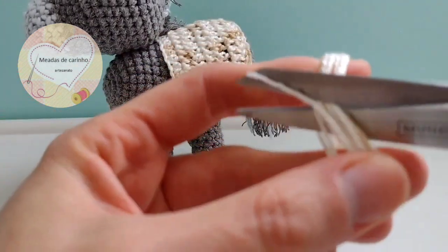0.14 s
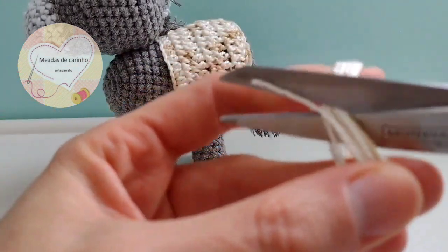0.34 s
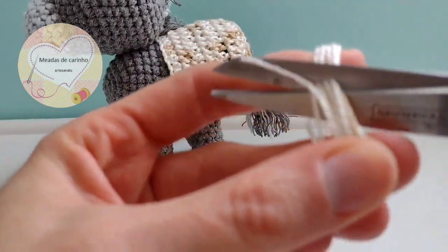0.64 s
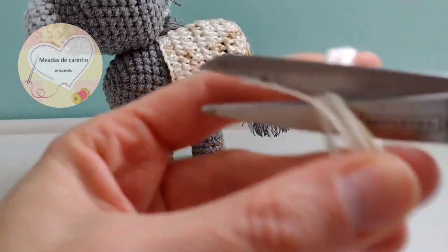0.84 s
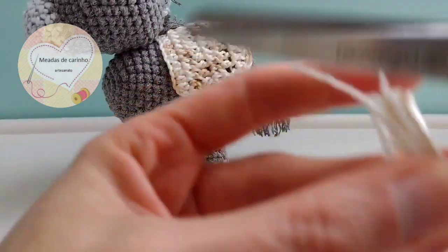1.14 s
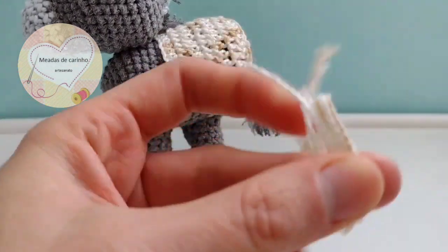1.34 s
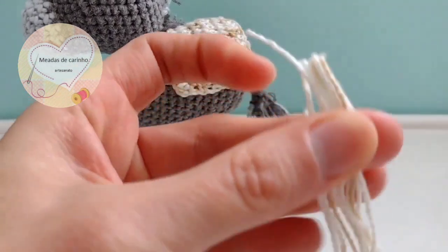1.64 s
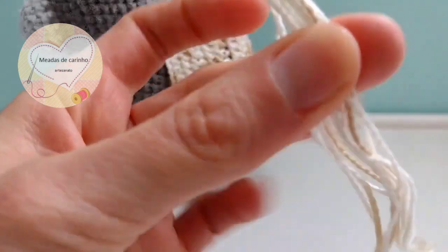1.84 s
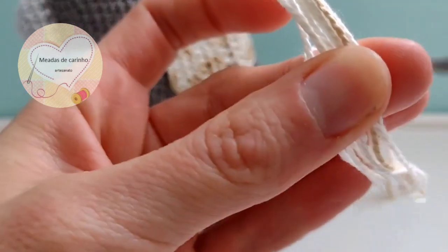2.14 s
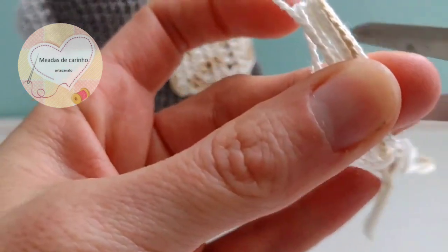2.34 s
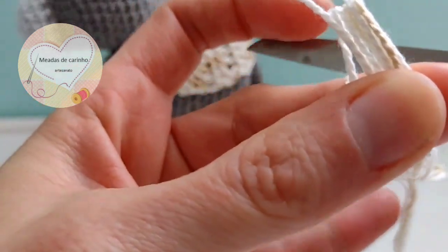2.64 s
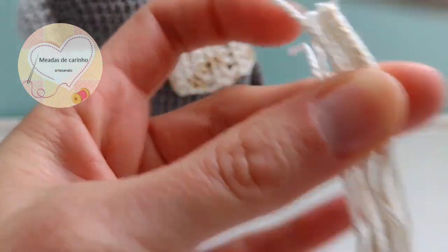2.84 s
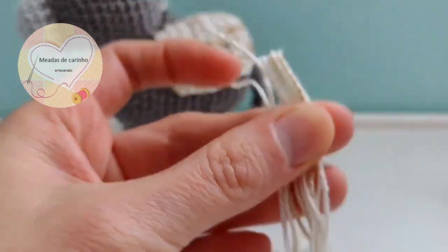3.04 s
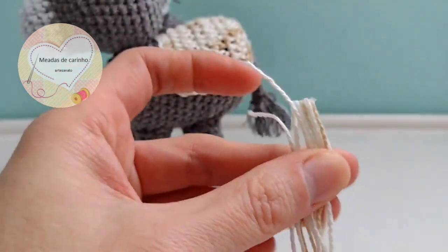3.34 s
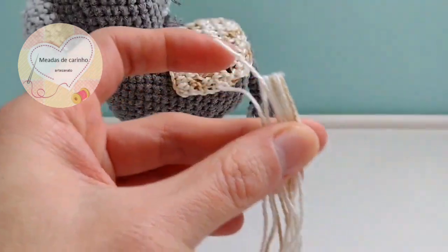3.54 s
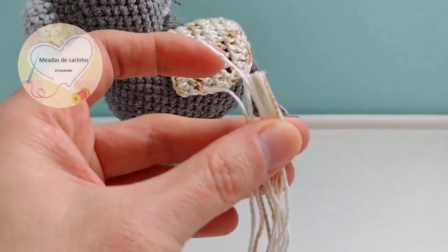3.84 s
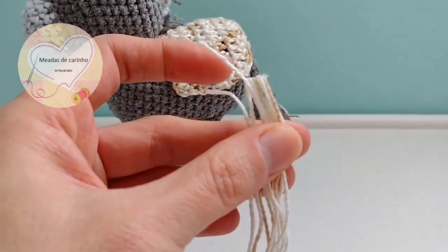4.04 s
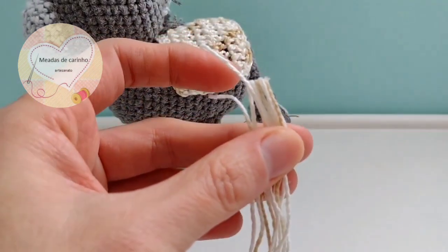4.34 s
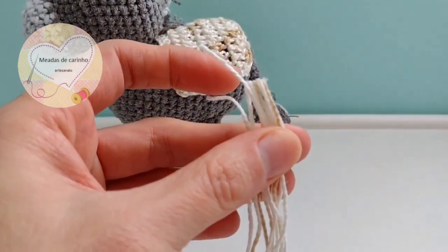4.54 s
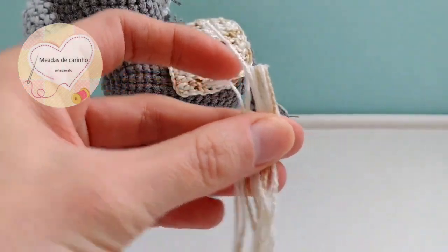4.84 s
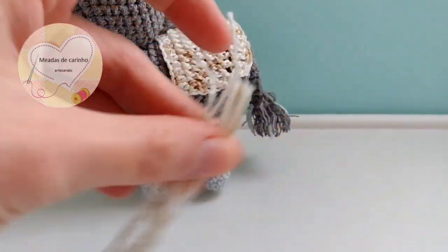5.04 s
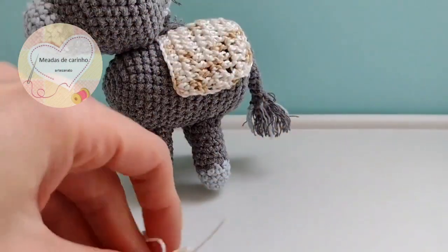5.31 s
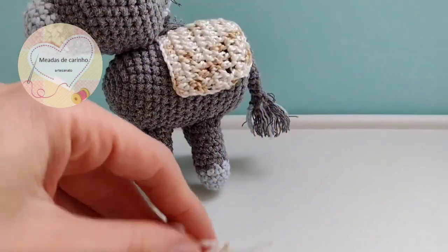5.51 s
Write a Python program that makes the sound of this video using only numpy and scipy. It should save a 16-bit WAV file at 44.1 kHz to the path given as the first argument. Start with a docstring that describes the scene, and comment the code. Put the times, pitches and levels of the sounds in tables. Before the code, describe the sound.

Close-up steel scissors snip cotton thread in crisp bright clusters, then are set down with a clack and slide on a table in a quiet room.

```python
"""Scissors cutting thread, close up

Steel scissors cut loops of cotton thread a hand's width from a phone, nearer its right microphone.
Uneven slips of the blades on the fibres make the cutting; snaps are short chatter and cracks of steel.
The scissors are laid on a table and pushed aside, and a hand brushes the top: its modes ring and the contact rasps.
Fingers roll the thread, edges squeak, soft bumps ring and faint hums swell.
A small quiet room adds reflections, steady air noise and faint far whistles; each channel has its own limiter."""
import sys
import numpy as np
from scipy import signal
from scipy.fft import rfft, irfft
from scipy.io import wavfile
from scipy.ndimage import uniform_filter1d

SR = 44100
rng = np.random.default_rng(int(sys.argv[2]) if len(sys.argv) > 2 else 0)


def to_wav(s):
    """Save 16-bit WAV."""
    ch = np.atleast_2d(s).T  # columns
    pcm = np.round(np.clip(ch, -1, 1) * 32767)  # PCM
    wavfile.write(sys.argv[1], SR, pcm.astype(np.int16))


N = 250160
TIME = np.arange(N) / SR
# modes of the table top, before a blow favours some of them: (f/Hz, level/dB, t60/s)
TABLE_MODES = [(102, -9.5, 0.15), (128, -8.5, 0.071), (146.3, -13, 0.19), (183.5, -2.5, 0.22),
               (224.7, -11, 0.27), (292.6, -20, 0.28), (391.4, -5, 0.16), (459.7, -11, 0.22),
               (494, -2, 0.048), (560, -1, 0.057), (624, -19, 0.3), (661, -1, 0.053), (710, -7, 0.16),
               (1158, 1.5, 0.023), (1277, 3, 0.065), (1412, -27, 0.057), (1970, -25, 0.19),
               (2460, -32, 0.12)]


def amp(db):
    """Decibels to gain."""
    return 10 ** (np.asarray(db) / 20)


def on_log(hz, points):
    """Read (Hz, value) points on a log-frequency axis."""
    f, value = np.transpose(points)
    return np.interp(np.log(hz + 1), np.log(f), value)


def colour(x, points, tilt_db=0, size=4096):
    """Causal filter of unit power gain: (Hz, dB) points set only its shape, tilted per octave."""
    hz = np.arange(size // 2 + 1) * SR / size
    db = on_log(hz, points) + tilt_db * np.log2((hz + 1) / SR)
    # folding the cepstrum puts the filter's energy as early as possible
    cepstrum = irfft(np.log(amp(db)))
    cepstrum[1:size // 2] *= 2
    cepstrum[size // 2 + 1:] = 0
    response = irfft(np.exp(rfft(cepstrum)))
    return signal.fftconvolve(x, response / np.linalg.norm(response))[:len(x)]


def add(track, s, sound):
    """Mix a sound into a track at time s."""
    i = max(int(s * SR), 0)
    track[..., i:i + sound.shape[-1]] += sound[..., :N - i]


def fade(t, t60):
    """Free decay, 60 dB down after t60."""
    return np.exp(-np.log(1000) * t / t60)


def ring(t, modes):
    """Struck modes decay freely; neighbouring ones mostly start in the same direction."""
    out = np.zeros(len(t))
    for k, (hz, db, t60) in enumerate(modes):
        direction = (-1) ** ((k + 1) // 3)
        out += direction * amp(db) * fade(t, t60) * np.sin(2 * np.pi * hz * t)
    return out


def friction(length, db, swell_s, change_db, rate, spread_db, release_s):
    """Tiny uneven slips under a pressure that swells, drifts to its final level and dies when motion stops."""
    t = TIME[:int((length + .1) * SR)]
    chance, size, side = rng.random((SR // 2, 3))[:len(t)].T
    waver_db = 1.2 * np.interp(t, np.arange(100) * .005, rng.standard_normal(100))
    slip_size = amp(waver_db - spread_db * np.log(np.maximum(size, .004)))
    slips = (chance < rate / SR) * np.sign(side - .5) * slip_size
    slips /= np.sqrt(np.mean(slips[t < length] ** 2)) + 1e-9
    pressure = amp(db + np.interp(t, [0, length], [-change_db, 0]))
    # a short jerk stops sooner than a long stroke
    pressure *= fade(np.maximum(t - length, 0), min(release_s, 2 * length))
    return slips * pressure * np.minimum(t / swell_s, 1) ** 2


def glide(length, db, first_hz, last_hz, raw_waver_hz, size):
    """A tone swells and fades while its pitch slides, unsteady by noise averaged over size samples."""
    count = int(length * SR)
    waver = uniform_filter1d(rng.standard_normal(N), size=size)[:count]
    hz = np.linspace(first_hz, last_hz, count) + raw_waver_hz * waver
    swell = np.sqrt(2 * np.hanning(count))
    return amp(db) * swell * np.sin(2 * np.pi * np.cumsum(hz) / SR)


def pair(x, left_db):
    """Sound from the right reaches the left microphone later and at its own level."""
    lag_s = .00039
    left = np.pad(x, (int(lag_s * SR), 0))[:len(x)]
    return np.array([amp(left_db) * left, x])


def diffuse(count, alike_hz):
    """Two-channel white noise, mostly alike in the bass and unrelated above."""
    mid, side = rfft(rng.standard_normal((2, count)))
    hz = np.arange(len(mid)) * SR / count
    likeness = .8 / (1 + (hz / alike_hz) ** 2)
    mid, side = mid * np.sqrt((1 + likeness) / 2), side * np.sqrt((1 - likeness) / 2)
    return irfft(np.array([mid + side, mid - side]), count)


def room(x, wet_db, build_s, count=26000):
    """Dense wall reflections build up quickly and lose their treble first."""
    # decay time of the small room: (f/Hz, t60/s)
    decay_points = [(100, 0.44), (600, 0.31), (9000, 0.3), (16000, 0.19)]
    t = TIME[:count]
    hz, times, cells = signal.stft(diffuse(count, alike_hz=530), SR)
    decay = fade(times, on_log(hz, decay_points)[:, None])
    tail = signal.istft(cells * decay, SR)[1][:, :count]
    tail *= 1 - np.exp(-(t / build_s) ** 2)
    tail /= np.linalg.norm(tail, axis=1, keepdims=True)
    return amp(wet_db) * signal.fftconvolve(x[None], tail, axes=1)[:, :N]


def air():
    """Steady room rumble and microphone hiss: coloured noise, alike in the bass on both microphones."""
    # shape of the background: (f/Hz, level/dB)
    air_points = [(14, -16), (24, 0), (49, -14.5), (73, -9), (96, -25), (145, -19.5), (345, -28.5),
                  (375, -24.5), (418, -35), (611, -25.5), (760, -35.5), (3580, -42.5), (4970, -44.5),
                  (11200, -43), (16000, -47.5)]
    level_db, left_db = -50.5, 0.77
    left, right = (colour(noise, air_points) for noise in diffuse(N, alike_hz=444))
    return amp(level_db) * np.array([amp(left_db) * left, right])


def openings():
    """Strokes of blades opening or shifting along the thread, with pressure easing off as they go."""
    # (t/s, length/s, swell/s, final level/dB, brightness/dB per octave, thread/dB, left microphone/dB)
    opening_rows = [(0.312, 0.056, 0.018, -60, 7, -26, -3.5), (0.875, 0.066, 0.064, -49.5, 4, -16, -5.5),
                    (1.215, 0.052, 0.022, -43.5, 3.5, -11.5, -14),
                    (1.907, 0.055, 0.015, -41.5, 4.5, -14.5, -14.5),
                    (2.906, 0.059, 0.021, -37, 1.5, -11.5, -18)]
    return [(*row, -10) for row in opening_rows]  # change of pressure, dB


def closings():
    """Strokes of blades closing, with pressure growing towards the tips."""
    # (t/s, length/s, swell/s, final level/dB, brightness/dB per octave, thread/dB, left microphone/dB)
    closing_rows = [(0.549, 0.074, 0.014, -39, -1.5, -22, -18), (1.026, 0.035, 0.012, -28.5, 3, -19, -11),
                    (1.39, 0.08, 0.045, -33, 8, -16.5, -12), (2.529, 0.18, 0.01, -55.5, 9, -25, -25),
                    (2.737, 0.03, 0.03, -29, 1, -16, -7.5), (3.029, 0.062, 0.048, -27.5, 6.5, -17.5, -11)]
    return [(*row, 5.5) for row in closing_rows]  # change of pressure, dB


def bites():
    """Strokes of thread giving way: a bright burst, and the last fibres tearing under falling pressure."""
    # (t/s, burst level/dB, tear length/s, tear's starting level/dB, tear's thread/dB, tear's left microphone/dB)
    bite_rows = [(0.6195, -21, 0.035, -26.5, -18.5, -19), (1.0644, -17, 0.0071, -31, -19, -26),
                 (2.7707, -16, 0.019, -21.5, -11, -17.5)]
    attack_s, burst_s, sag_db = 0.00055, 0.0056, -6
    burst_bright_db, tear_bright_db = 9.5, 6.5  # per octave
    burst_thread_db, burst_left_db = -33.5, -35.5
    strokes = []
    for s, burst_db, tear_s, tear_db, thread_db, left_db in bite_rows:
        strokes.append((s, burst_s, attack_s, burst_db, burst_bright_db, burst_thread_db, burst_left_db, 0))
        final_db = tear_db + sag_db
        strokes.append((s, tear_s, attack_s, final_db, tear_bright_db, thread_db, left_db, sag_db))
    return strokes


def rustles():
    """Strokes of fingers rolling the thread: the same slips, soft, even in pressure and duller."""
    # (t/s, length/s, level/dB)
    rustle_rows = [(0.735, 0.049, -57), (2.098, 0.084, -61.5), (4.271, 0.14, -58.5), (4.71, 0.077, -61),
                   (4.849, 0.097, -62)]
    swell_s, bright_db, thread_db, left_db = .04, -3, -4, -17.5  # brightness per octave
    return [(s, length, swell_s, db, bright_db, thread_db, left_db, 0) for s, length, db in rustle_rows]


def shearing():
    """Fibres part in a fast crackle of slips, heard as bright shearing over a duller rasp of cotton."""
    # colour of the shearing: (f/Hz, level/dB)
    shear_points = [(200, -36.5), (1000, -39), (2100, -18), (3400, -15), (4300, -5), (6500, -8.5),
                    (8500, -1), (10500, -0.5), (12500, -4.5), (14500, -9), (16000, -17)]
    # the duller rasp of tearing cotton: (f/Hz, level/dB)
    thread_points = [(100, -5), (500, -2), (1000, -5), (2200, 0), (3200, -1), (8000, -22)]
    out, source = np.zeros((2, N)), np.zeros(N)
    strokes = openings() + closings() + bites() + rustles()
    for s, length, swell_s, db, bright_db, thread_db, left_db, change_db in strokes:
        # rate in slips per second
        slips = friction(length, db, swell_s, change_db, rate=4200, spread_db=3.5, release_s=.014)
        rasp = amp(thread_db) * colour(slips, thread_points)
        cut = colour(slips, shear_points, bright_db) + rasp
        add(out, s, pair(cut, left_db))
        # a cut close to the right microphone is loud there but weak in the room
        add(source, s, amp(left_db) * cut)
    return out + room(source, wet_db=4.5, build_s=0.00026)


def bumps():
    """Single damped rings from handling and from the knocked table: mostly soft low bumps, some taps, a small ping."""
    # (t/s, level/dB, f/Hz, t60/s)
    bump_rows = [(1.066, -34.5, 74.5, 0.13), (2.768, -27, 48.7, 0.05), (2.8005, -27, 110, 0.026),
                 (3.592, -41, 580, .1), (3.806, -29, 623, 0.12), (3.962, -28, 135, 0.069),
                 (4.501, -40.5, 1990, 0.031), (5.372, -30, 40.2, 0.26), (5.368, -26, 71, 0.13)]
    out, t = np.zeros(N), TIME[:SR // 2]
    for s, db, hz, t60 in bump_rows:
        add(out, s, ring(t, [(hz, db, t60)]))
    return pair(out, left_db=-7.0)


def whistles():
    """Distant thin tones, perhaps a bird, arrive only by way of the walls."""
    # (t/s, length/s, level before the room/dB, first f/Hz, last f/Hz)
    whistle_rows = [(1.144, .27, -67.5, 4350, 4130), (1.66, 0.15, -74, 3900, 3800),
                    (2.096, 0.18, -75, 3720, 3820), (3.587, 0.06, -67, 4420, 4360),
                    (3.896, 0.085, -67, 4040, 3930)]
    source = np.zeros(N)
    for s, length, db, first_hz, last_hz in whistle_rows:
        add(source, s, glide(length, db, first_hz, last_hz, raw_waver_hz=6000, size=400))
    return room(source, wet_db=5, build_s=0.0061)


def squeaks():
    """The edges sing briefly as they pass: short gliding tones, most of them rising."""
    # (t/s, length/s, level/dB, first f/Hz, last f/Hz)
    squeak_rows = [(1.213, .012, -39, 11200, 10000), (1.28, 0.061, -48.5, 9200, 10700),
                   (1.395, 0.044, -37.5, 9100, 10950), (1.98, 0.016, -40.5, 10400, 10570),
                   (3.031, 0.044, -39, 10400, 12200)]
    out = np.zeros((2, N))
    for s, length, db, first_hz, last_hz in squeak_rows:
        squeak = glide(length, db, first_hz, last_hz, raw_waver_hz=2475, size=20)
        add(out, s, pair(squeak, left_db=-17))
    return out


def snaps():
    """Steel meets steel: the blades hit their stop and chatter for milliseconds, with a broad crack."""
    # (t/s, level/dB, crack/dB, brightness/dB per octave, left microphone/dB)
    snap_rows = [(1.368, -30.5, -6.5, 7, -3.5), (1.4687, -21, -39, -4, 4), (1.4782, -4.5, -7, 1.5, -15),
                 (2.7981, -13, -0.5, 1, -20), (3.091, 2.5, -17.5, 2.5, -8), (3.3412, -9.5, 0, -4, -3.5),
                 (3.3733, -8.5, -8.5, -2.5, -15.5), (4.4637, -27.5, -7, -0.5, -10),
                 (4.5005, -45.5, 10, -9, -5)]
    # broad resonance of the hand-damped blades: (f/Hz, level/dB)
    blade_points = [(1000, -32.5), (3600, -13.5), (5200, -8), (7000, -3.5), (10600, -6.5), (13200, -14),
                    (15200, -18.5), (16500, -22)]
    # colour of the crack: (f/Hz, level/dB)
    crack_points = [(100, -7.5), (600, 1), (1300, 1), (2500, -6), (3800, 1.5), (7000, -9), (11000, 6.5),
                    (16000, -20)]
    out, source, t = np.zeros((2, N)), np.zeros(N), TIME[:SR // 10]
    for s, db, crack_db, bright_db, left_db in snap_rows:
        rattle = fade(t, t60=0.0075) + amp(-25) * fade(t, t60=.02)
        chatter = np.sign(rng.standard_normal(len(t))) * rattle
        blow = signal.unit_impulse(len(t)) * np.linalg.norm(chatter)
        heard = []
        for force in (chatter, blow):
            crack = amp(crack_db) * colour(force, crack_points)
            heard.append(amp(db) * (colour(force, blade_points, bright_db) + crack))
        near, far = heard
        add(out, s, amp(-1) * pair(near, left_db))
        # the walls gather the blow from all directions, which evens out its spectrum
        add(source, s, amp(left_db) * far)
    return out + room(source, wet_db=-4.5, build_s=0.0016)


def knocks():
    """Blows shake the modes of the table top; the contact adds a noisy clack and a hard tick."""
    # (t/s, ring/dB, bass weight/dB, favoured f/Hz, clack/dB, tick before doubling/dB)
    knock_rows = [(3.3405, -22.5, 8, 566, -21.5, -17.5), (3.3726, -33.5, 6.5, 595, -45, -15),
                  (3.8267, -30.5, 2.5, 347, -23.5, -10.5), (4.0137, -28, -7, 395, -18.5, -13),
                  (5.2765, -57.5, 3, 650, -37.5, -48), (5.3695, -49, 3, 655, -19.5, -10.5)]
    # colour of the clack: (f/Hz, level/dB)
    clack_points = [(50, -15), (120, -6.5), (300, -1), (450, -4.5), (700, -5), (950, -9), (1300, 0.5),
                    (1750, -11.5), (2400, -5), (3300, -25.5), (5500, -18), (10000, -20.5), (16000, -33)]
    # the hard first touch on the table: (f/Hz, level/dB)
    tick_points = [(100, -19), (600, 8.5), (1300, 14.5), (2500, 0), (3800, 5), (7000, -2.5), (10500, 4),
                   (12500, -17), (16000, -11)]
    out, t = np.zeros(N), TIME[:SR // 2]
    for s, ring_db, bass_db, spot_hz, clack_db, tick_db in knock_rows:
        modes = []
        for hz, db, t60 in TABLE_MODES:
            # a heavy blow feeds the lowest modes, and each spot favours the modes near one pitch
            weight_db = bass_db / (1 + (hz / 300) ** 4)
            spot_db = 8 / (1 + (np.log2(hz / spot_hz) / .2) ** 2)
            modes.append((hz, db + weight_db + spot_db, t60))
        clack = colour(rng.standard_normal(len(t)) * fade(t, 0.025), clack_points)
        tick = colour(fade(t, .0001), tick_points)
        add(out, s, amp(ring_db) * ring(t, modes) + amp(clack_db) * clack - 2 * amp(tick_db) * tick)
    return out


def slides():
    """Scissors, then a hand, slide on the table: slips rasp and hiss, and push its modes into a boom."""
    # (t/s, length/s, swell/s, final level/dB, rate/slips per second, table ring/dB, hiss/dB)
    slide_rows = [(3.633, 0.11, 0.07, -28.5, 6200, -6.5, -4.5),
                  (3.735, 0.222, 0.0095, -51.5, 2500, 14, -11), (5.272, 0.1, 0.029, -31, 890, -26, -10.5),
                  (5.517, 0.027, 0.011, -33, 2470, -9.5, -7)]
    # colour of the rubbing: (f/Hz, level/dB)
    rub_points = [(60, -36), (200, -2.5), (300, 1.5), (450, 2), (680, 7), (950, -4.5), (1400, 2),
                  (1900, -7.5), (2400, -4), (3300, -8), (6000, -19), (16000, -47)]
    # colour of the hiss of contact: (f/Hz, level/dB)
    hiss_points = [(1000, -25.5), (3000, 10), (4800, -1), (6800, 0), (8500, 1), (10800, 2), (13000, -8.5),
                   (16000, -14)]
    # force of the sliding on the table: (f/Hz, level/dB)
    push_points = [(60, -4.5), (120, 2.5), (190, 6), (280, -14.5), (390, 1), (550, -0.5), (900, -15.5),
                   (3000, -12)]
    out, top = np.zeros(N), ring(TIME[:SR // 2], TABLE_MODES)
    for s, length, swell_s, db, rate, ring_db, hiss_db in slide_rows:
        slips = friction(length, db, swell_s, change_db=2, rate=rate, spread_db=3.5, release_s=0.028)
        add(out, s, colour(slips, rub_points) + amp(hiss_db) * colour(slips, hiss_points))
        boom = signal.fftconvolve(colour(slips, push_points), top)
        # the ring's level is relative to the energy of the slips
        add(out, s, amp(ring_db) * boom * np.linalg.norm(slips) / np.linalg.norm(boom))
    return out


def table():
    """The table top carries knocks and slides to both microphones, with a delayed opposed part."""
    out = knocks() + slides()
    # the wide table top sends part of its sound to the two microphones from different places
    flank = colour(out, [(60, -16), (250, -30), (550, -4.0), (1500, -23), (6000, 28), (16000, -19)])
    spread = amp(-18.0) * np.array([flank, -flank])
    direct = pair(out, left_db=0) * amp(1.0) + np.roll(spread, int(0.0011 * SR), axis=1)
    return direct + room(out, wet_db=-4.5, build_s=0.00042)


def hums():
    """A faint steady-pitched hum comes and goes three times."""
    # (t/s, length/s, peak level/dB)
    hum_rows = [(4.167, 0.06, -50), (4.249, 0.055, -49), (4.348, 0.083, -46.5)]
    hum_hz, out = 305.3, np.zeros(N)
    for s, length, db in hum_rows:
        count = int(length * SR)
        swell = np.sqrt(np.hanning(count))
        add(out, s, amp(db) * swell * np.sin(2 * np.pi * hum_hz * TIME[:count]))
    return pair(out, left_db=-7.0)


def scene():
    """Scissors, table and hands in the quiet room."""
    return air() + shearing() + bumps() + whistles() + squeaks() + snaps() + table() + hums()


def record(dry):
    """Each channel's limiter ducks just after a peak, so the first instant clips, and recovers slowly."""
    delay_s, recovery_db_per_s, top_hz = 0.0011, 18.5, 16100
    recovery_db = recovery_db_per_s * TIME
    late = np.roll(dry, int(delay_s * SR), axis=1)
    over_db = 20 * np.log10(np.maximum(abs(late), 1))
    duck_db = np.maximum.accumulate(over_db + recovery_db, axis=1) - recovery_db
    limited = np.clip(dry * amp(-duck_db), -1, 1)
    # a steep filter cuts the extreme treble
    return signal.sosfilt(signal.ellip(10, .2, 70, top_hz, fs=SR, output="sos"), limited)


dry = scene()
out = record(dry)
to_wav(out)
```